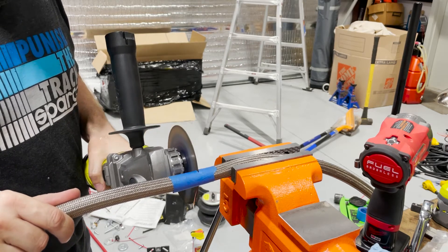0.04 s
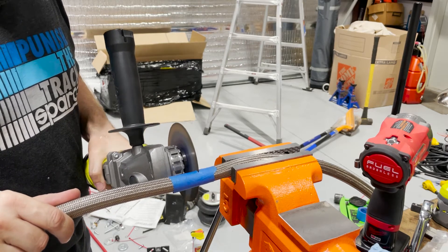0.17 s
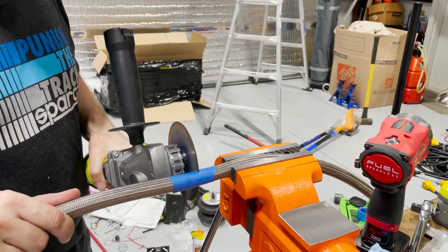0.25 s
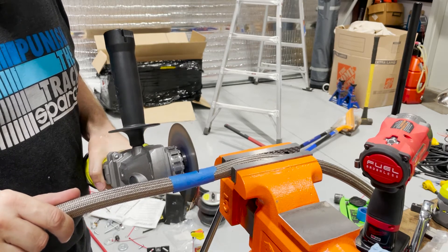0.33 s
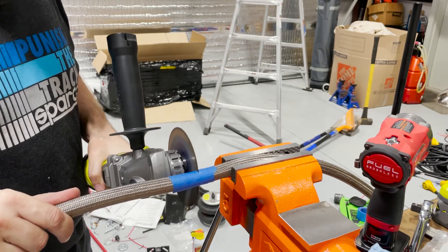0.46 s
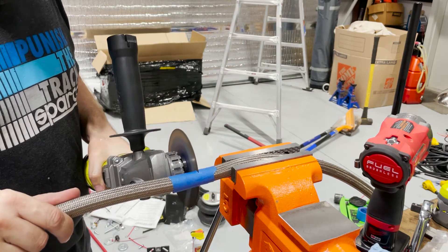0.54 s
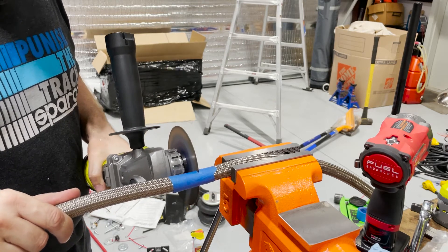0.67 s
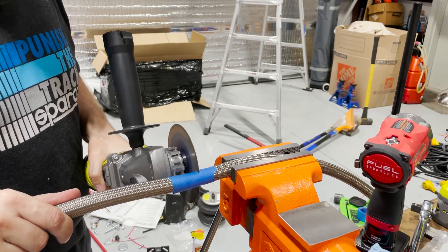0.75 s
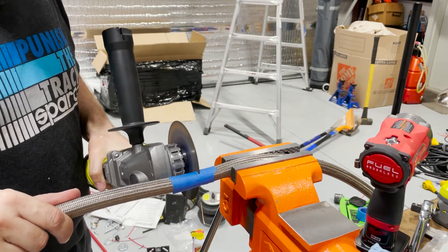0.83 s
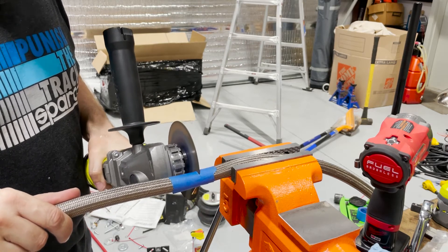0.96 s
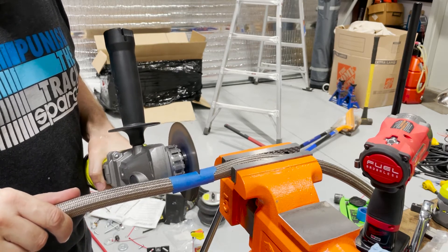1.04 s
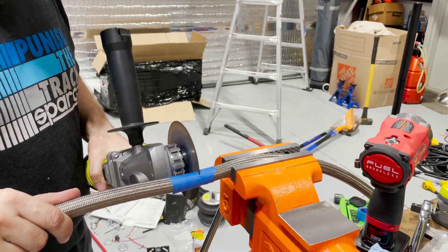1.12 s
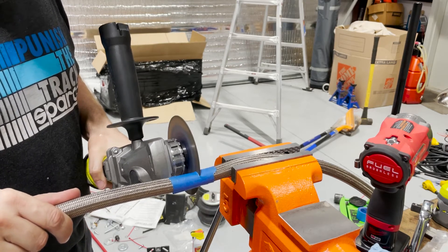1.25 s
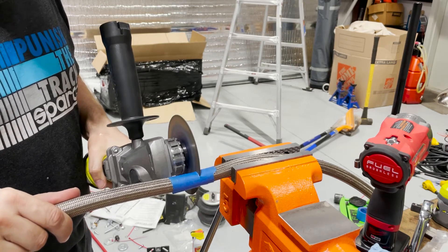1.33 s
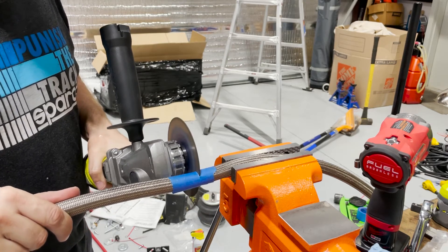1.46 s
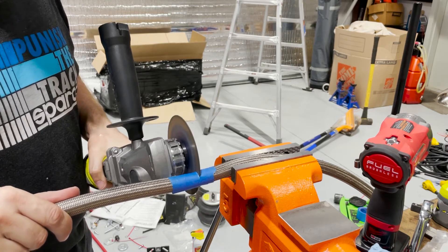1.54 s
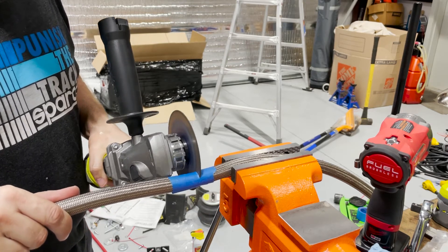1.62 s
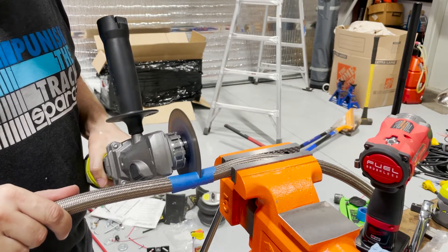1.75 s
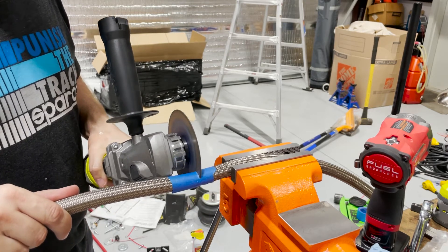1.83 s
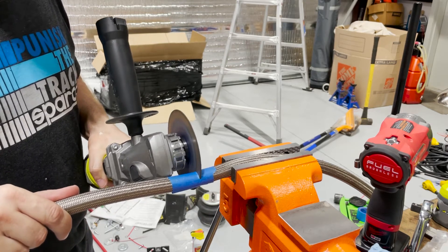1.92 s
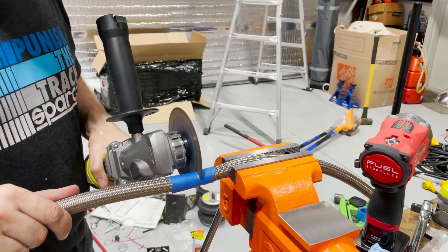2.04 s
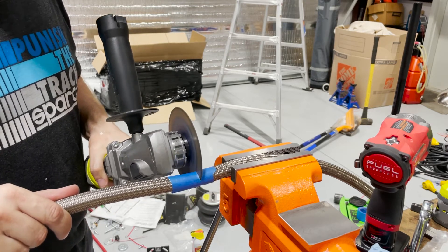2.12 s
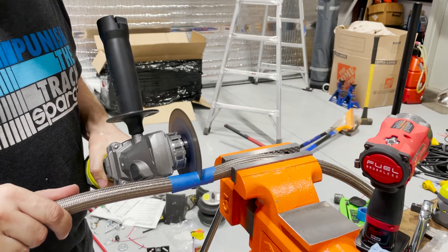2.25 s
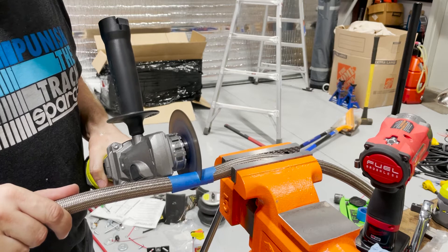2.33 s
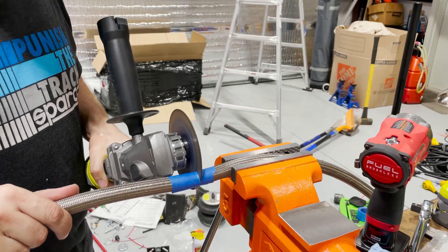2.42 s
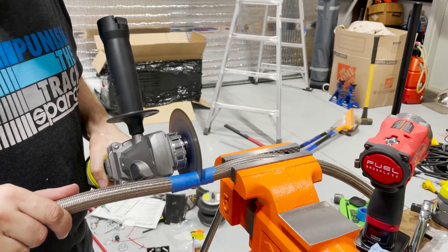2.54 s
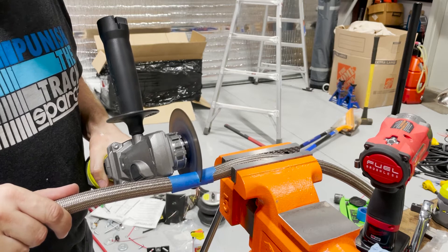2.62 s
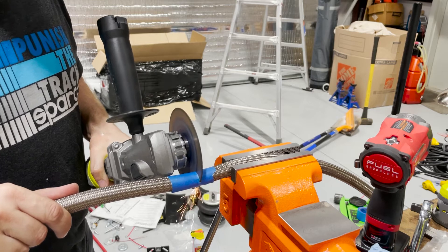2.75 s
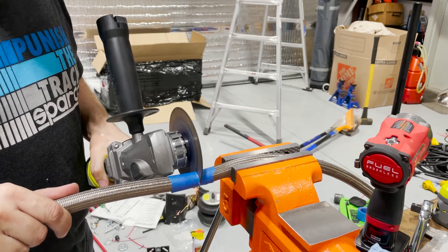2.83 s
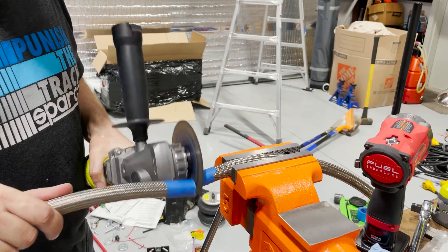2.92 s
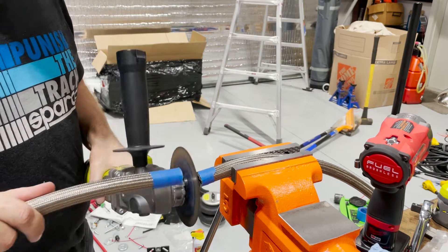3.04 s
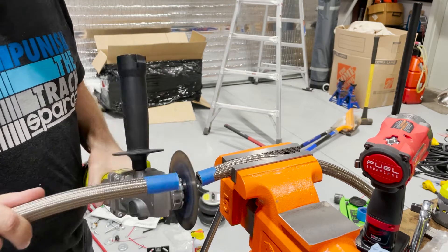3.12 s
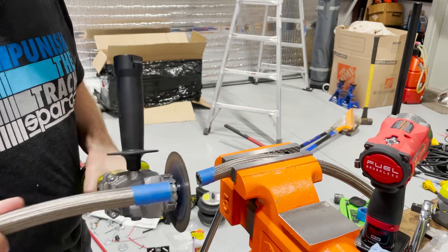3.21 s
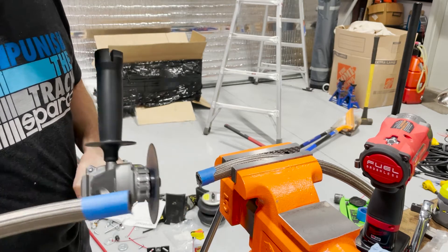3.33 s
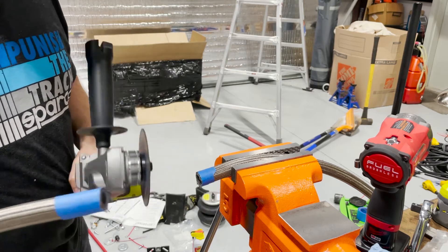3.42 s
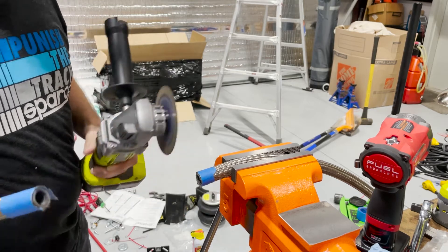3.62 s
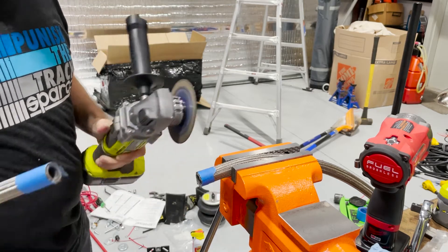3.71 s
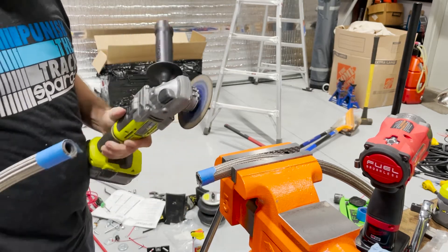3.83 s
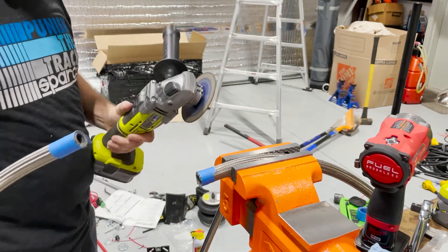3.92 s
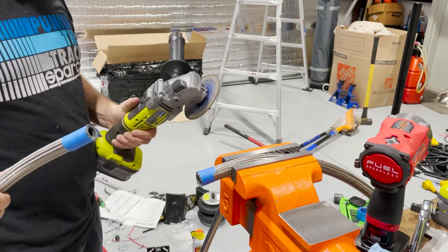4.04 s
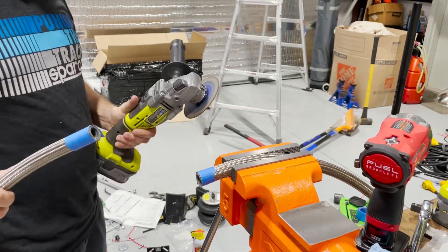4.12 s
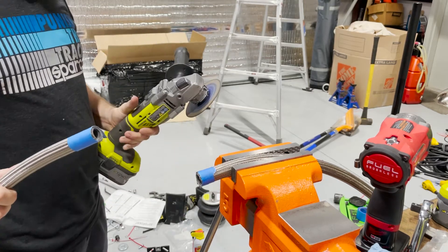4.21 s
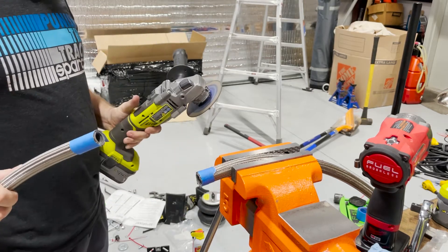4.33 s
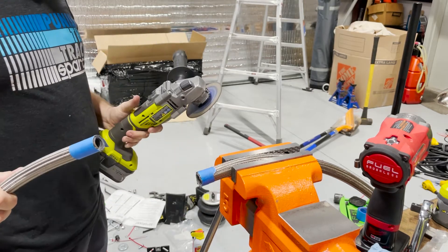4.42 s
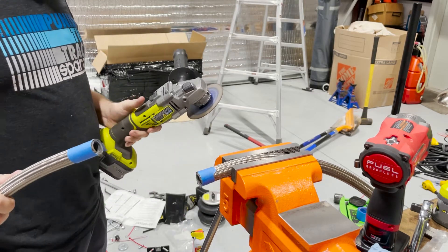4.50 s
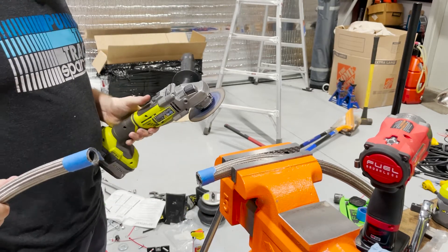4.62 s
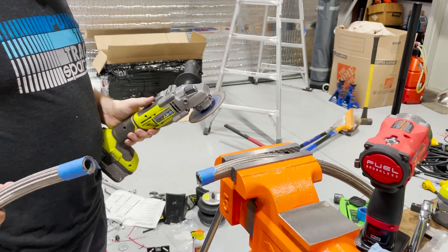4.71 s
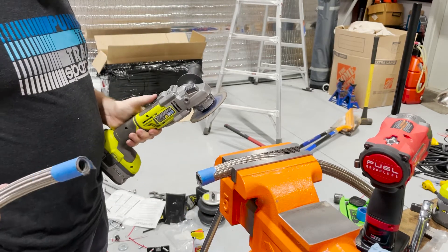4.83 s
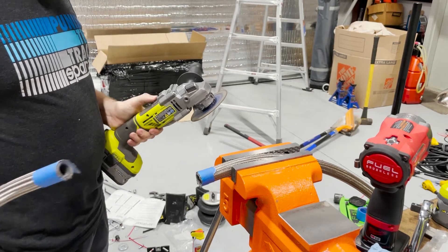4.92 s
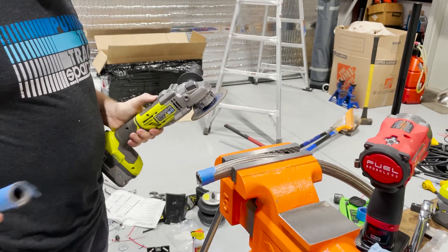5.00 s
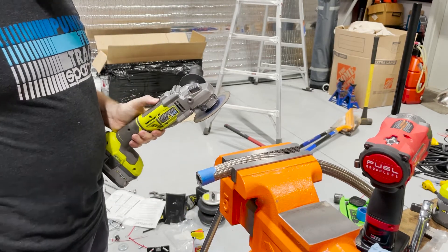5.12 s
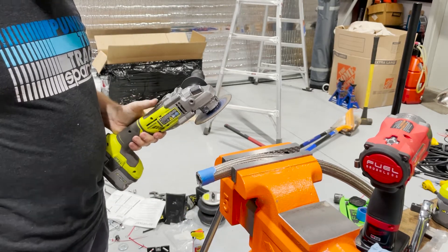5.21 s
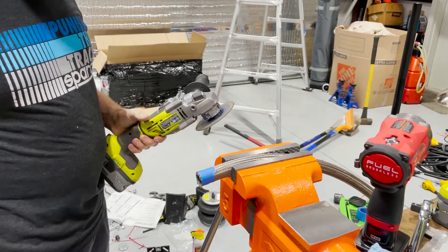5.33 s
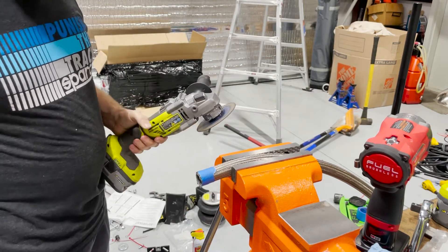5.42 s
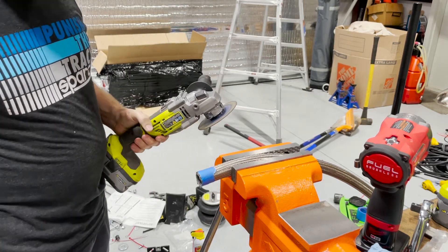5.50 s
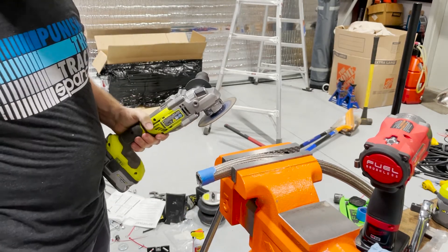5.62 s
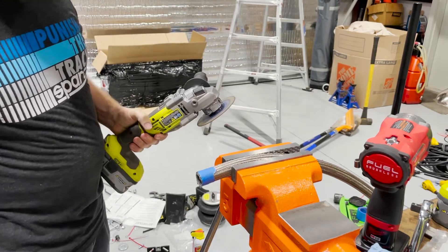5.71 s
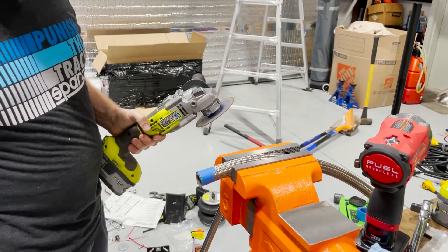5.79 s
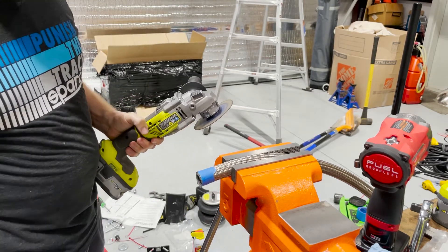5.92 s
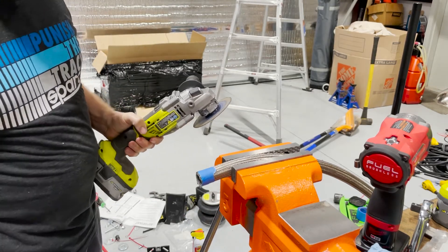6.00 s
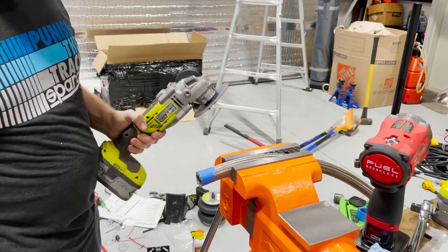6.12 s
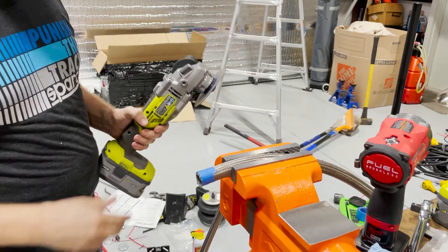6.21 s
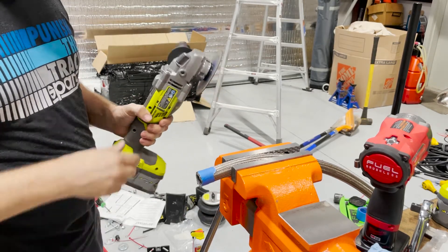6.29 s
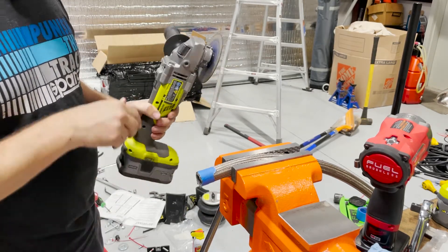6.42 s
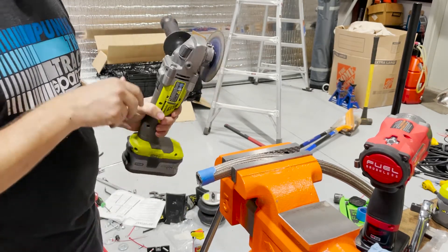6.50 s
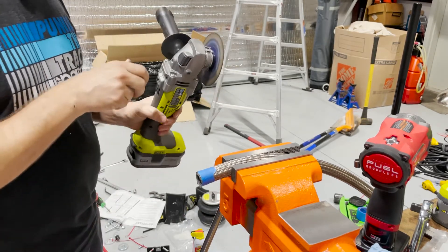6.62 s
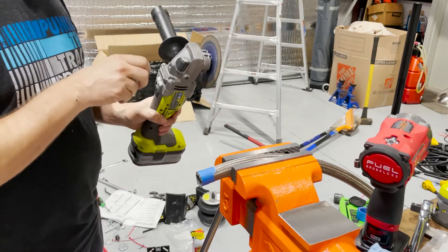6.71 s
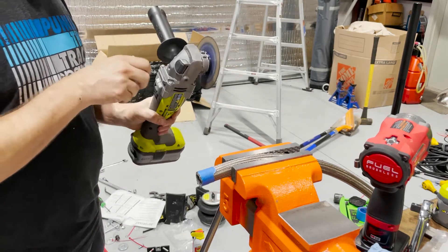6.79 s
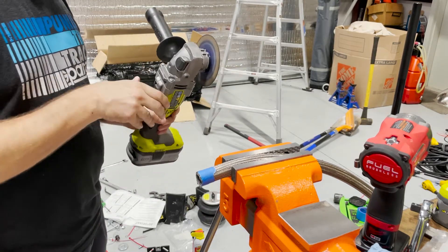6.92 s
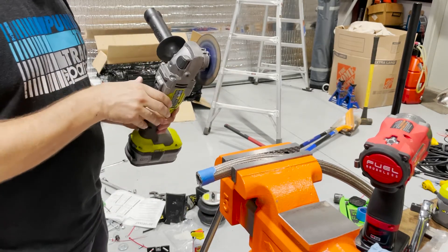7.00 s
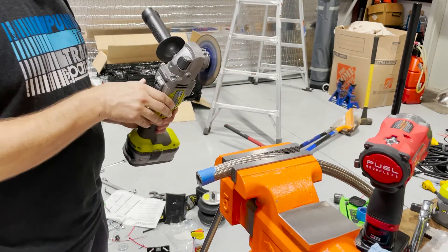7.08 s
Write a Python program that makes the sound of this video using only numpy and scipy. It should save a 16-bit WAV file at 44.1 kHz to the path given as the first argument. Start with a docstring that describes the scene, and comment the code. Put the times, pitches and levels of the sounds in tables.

```python
"""In a garage, a cordless angle grinder scrapes through a braided hose in a vise: patterned noise that wears away.
One motor speed drives scrape, gear and fan whine and magnet hum, all built on multiples of that speed.
The wheel breaks through, the loose end brushes it once more, and the motor speeds up with rushing air noise;
without load the gear teeth rattle in their play, as short bursts of noise that ring the case.
The trigger ticks, then the tool coasts down, still rattling, with the magnets tugging at the case."""
import sys
import numpy as np
from scipy import signal
from scipy.fft import rfft, irfft, next_fast_len
from scipy.io import wavfile
from scipy.ndimage import uniform_filter1d, map_coordinates

SR = 44100
rng = np.random.default_rng(int(sys.argv[2]) if len(sys.argv) > 2 else 0)


def generate_wav(signal):
    """Clip the signal to [-1, 1] and save it as 16-bit WAV at the path in sys.argv[1]."""
    frames = np.transpose(np.atleast_2d(signal))
    scaled = np.clip(frames, -1, 1) * 32767
    pcm = np.round(scaled).astype(np.int16)
    wavfile.write(sys.argv[1], SR, pcm)


def volts_from_decibels(level):
    """Turn decibel levels (scalar or array-like) into linear amplitude factors."""
    exponent = np.asarray(level, float) / 20
    return 10 ** exponent


N = 315298  # length in samples

# Motor speed while cutting. Each row: time in seconds, motor turns a second before the hand's tremble.
CUTTING_SPEED = [(0, 311), (.07, 316), (.17, 317), (.26, 302.5), (.38, 304.4), (.57, 316.5), (.73, 316),
                 (.84, 291), (.94, 289.3), (1.09, 294), (1.19, 290), (1.28, 281), (1.5, 281.5),
                 (1.57, 278.5), (1.68, 270.6), (1.74, 273.3), (1.92, 275.5), (1.99, 271.3), (2.16, 265.8),
                 (2.36, 276), (2.5, 276.5), (2.62, 269), (2.69, 268), (2.875, 261)]
GEAR = 16 / 40  # pinion teeth over wheel gear teeth
IDLE_TURNS, CREEP_TURNS_PER_S = 358.6, .42  # turns a second without load, and its slow rise each second
RECOVER_S, DRAG_SHARE = .11, 1 / 3  # time to pick up speed; share of the sag held by the last strands
COAST_AT_S, COAST_S = 5.206, 2.256  # power off; decay time
FRICTION_TURNS = 111.8  # dry friction, as a speed in turns a second
TREMBLE_TURNS = .55  # unsteadiness of the hand's push, in turns a second
FREE_S = 2.93  # the wheel breaks through

# Loudness of the scrape. Each row: time in seconds, level in dB at full contact.
SCRAPE = [(0, -30.5), (.18, -27.5), (.36, -26.5), (.45, -28.5), (.7, -26.5), (.9, -26), (1.26, -27.5),
          (1.35, -26.5), (1.7, -28), (1.98, -28), (2.16, -32.5), (2.34, -28), (2.43, -29), (2.7, -28),
          (2.9, -27.5)]
# Wheel, hose and vise as one sounding body. Each row: frequency in Hz, relative level in dB.
HOSE_BODY = [(53, -69), (90, -34.5), (223, -39.5), (495, -38.5), (563, -28), (714, -32.5), (1120, -34),
             (1360, -28), (2050, -25), (3230, 10), (4460, -5.5), (5310, -22.5), (7660, -12), (10800, -15.5),
             (15600, -24.5)]
# Resonances of that body. Each row: frequency in Hz, width in Hz, lift in dB.
HOSE_RINGS = [(7460, 240, 5), (10910, 400, 7.5), (1366, 230, 7), (1753, 73, -2), (13700, 180, -5),
              (15100, 1200, 10)]
SPARKS_DB, SPARKS_DB_PER_S = -34, 1.02  # the hiss grows as the wheel sinks in
STRANDS_DB, STRANDS_DB_PER_S = -39, -2  # the sound below 2 kHz fades as strands part
PART_S, PART_DB_PER_S = 2.915, -300  # the hose parts and contact dies away
SNAG_S, SNAG_LENGTH_S, SNAG_DB = 2.985, 0.011, -6  # the loose end brushes the wheel once more

# Loudness of the tones, one list a family: tooth mesh, magnet poles, fan blades, shaft, middle overtones,
# high overtones, mesh octave. Each row: time in seconds, family level in dB before each tone's own offset.
WHINE_LEVELS = [
    [(0, -43), (.35, -52), (.6, -48), (.9, -47), (1.13, -49), (1.28, -32.5), (1.62, -30.5), (2.5, -30),
     (2.88, -36.5), (3.0, -41), (3.15, -68), (3.5, -53), (4.2, -58), (5.1, -49), (5.3, -66), (5.9, -63),
     (6.06, -52), (6.25, -68), (6.6, -75)],
    [(0, -37), (.12, -36.5), (.38, -47), (.65, -36.5), (.78, -40), (.88, -64), (2.9, -57), (3.0, -42),
     (3.25, -33.5), (3.5, -32.5), (3.72, -42), (4.0, -36.5), (5.05, -37), (5.25, -49.5), (5.65, -76),
     (6.3, -76), (6.6, -66), (6.9, -79), (7.15, -90)],
    [(0, -65), (.2, -39), (.78, -46.5), (1.0, -66), (1.12, -37), (1.27, -60), (2.4, -51), (2.75, -35.5),
     (3.0, -46.5), (3.38, -54), (3.75, -49.5), (3.95, -40), (4.4, -43), (4.75, -48.5), (5.65, -45.5),
     (6.1, -60.5), (7.15, -83)],
    [(0, -59), (.19, -56.5), (.25, -78), (.42, -80), (.48, -56), (.74, -56), (.8, -61.5), (2.8, -61),
     (3.0, -76), (3.5, -71), (4.0, -75.5), (4.2, -66), (5.25, -67.5), (5.4, -86)],
    [(0, -57), (.78, -46), (.88, -70), (2.9, -72.5), (3.1, -55), (3.6, -60), (4.2, -49), (5.15, -52),
     (5.45, -57), (5.65, -47), (5.85, -51.5), (6.05, -70), (7.15, -71)],
    [(2.9, -77), (3.1, -57), (3.55, -51), (3.9, -59), (4.35, -62), (4.85, -59), (5.4, -64), (5.65, -57),
     (5.85, -67), (6.1, -78)],
    [(1.2, -56), (1.9, -45), (2.05, -45), (2.3, -40), (2.45, -51), (2.65, -36.5), (2.88, -41), (3.0, -88),
     (4.9, -76), (5.3, -83)],
]
# Which multiples of the motor speed sing, one list a family in the same order.
WHINE_MULTIPLES = [
    [16, 17],
    [8, 9, 10, 5.6, 40],
    [13, 28],
    [1, 2, 3, 5],
    [12, 14, 24],
    [20, 26, 39],
    [32],
]
# Offset of each of those multiples, one list a family. Each row: dB under load, dB running free.
WHINE_OFFSETS = [
    [(0, -1), (-16.5, -11)],
    [(-2, -2.5), (-6.5, -25), (5.5, -26), (-9, -45), (-21, -48)],
    [(5, 0), (-16, -34)],
    [(-25, 0), (-2.5, -11.5), (-10, -8), (5.5, -18)],
    [(0, -1), (-15, -9), (-1, -17)],
    [(2, -1.5), (0, -2.5), (-6, -23)],
    [(2, 9)],
]
# Two low tones. Each row: time in seconds, hum at wheel speed in dB, growl at four times motor speed in dB.
HUM_LEVELS = [(0, -90, -81), (.75, -93, -45.5), (.9, -95, -67), (2.9, -100, -61), (2.96, -90, -46.5),
              (3.08, -77, -50), (3.3, -76, -52), (3.8, -76, -83), (4.1, -82, -60), (5.2, -84, -61.5),
              (5.45, -91, -53.5), (5.55, -95, -96)]

# Steady hum of the room. Each row: frequency in Hz, relative level in dB.
ROOM_FLOOR = [(20, -28), (60, -1.5), (130, -2.5), (300, -6.5), (900, 2), (3000, -9), (15000, -34)]
ROOM_FLOOR_DB = -66.5  # its overall level

# Noise of the free tool. Each row: time in seconds, air in dB, light taps in dB (both relative).
FREE_NOISE = [(2.9, -42.5, -29), (3.05, -48.5, -39.5), (3.3, -50, -55), (3.55, -50.5, -39.5),
              (3.8, -51, -43), (4, -52, -56), (4.8, -54, -48), (5.3, -53.5, -41), (5.5, -59, -42.5),
              (5.9, -68.5, -55), (6.2, -73, -46), (6.7, -70.5, -53), (7.15, -82, -58)]
# Tone colour of the fan air. Each row: frequency in Hz, relative level in dB.
AIR_COLOUR = [(53, -67), (90, -35), (301, -35), (358, -30), (986, -24.5), (1390, -6), (1770, -19),
              (2660, -6.5), (2840, -12.5), (3030, -9.5), (4760, -14.5), (5080, -32), (5910, -14.5),
              (6580, -15.5), (15600, -39)]
# Tooth knocks at set times, strong and weak. Each row: time in seconds, relative strength in dB.
SET_KNOCKS = [(3.035, -37), (3.16, -35), (3.2523, -31), (3.3481, -29), (3.432, -29.5), (3.751, -28),
              (3.877, -30), (3.9554, -31), (4.1145, -32), (4.1564, -32), (4.24, -31), (4.332, -36),
              (4.415, -30), (4.4903, -27), (4.5264, -28), (4.6663, -29), (4.7967, -29.5), (4.9023, -30),
              (4.9772, -31), (5.238, -32), (5.3932, -28), (5.4917, -32), (5.5494, -23), (5.583, -25.5),
              (5.6294, -29), (5.6565, -30), (5.691, -25), (5.7195, -25), (5.7677, -25.5), (5.8006, -29),
              (5.865, -30), (5.8855, -28), (5.9331, -31), (5.976, -28), (6.0686, -27), (6.093, -29.5),
              (6.134, -29), (6.2077, -25.5), (6.301, -26), (6.3491, -26), (6.3882, -26), (6.4186, -30.5),
              (6.4829, -31), (6.5682, -28.5), (6.6965, -33), (6.7433, -29.5), (6.8268, -33),
              (6.8765, -30.5), (6.965, -31.5), (7.0128, -28.5), (7.0855, -29.5), (7.116, -26),
              (7.143, -28.5)]
# Knocks that fill the time between those. Each row: time in seconds, knocks a second,
# usual relative strength in dB, typical scatter of the strength in dB.
FILLING_KNOCKS = [(3.15, 69, -35, 3), (3.42, 71, -34, 3.5), (3.5, 54, -33.5, 6.5), (3.85, 52, -33, 5),
                  (3.95, 57, -33, 1.5), (4.3, 69.6, -32.5, 1), (5.2, 58, -32.5, 1), (5.6, 60, -31.5, 4),
                  (6.2, 85, -31, 4), (6.6, 103, -34.5, 5), (7.15, 92, -38, 5)]
UNEVEN = .12  # timing scatter of the filling knocks, as a share of the gap between knocks
# Resonances of the gear case, one list a part. Each row: frequency in Hz, width in Hz, relative level in dB.
GEAR_CASE = [
    [(447, 170, 0)],
    [(559.8, 21.3, 7.5)],
    [(1160, 110, -22), (2522, 226, -1.5), (3105, 233, 2), (3284, 340, 4), (3690, 170, -3.5),
     (4400, 280, -25), (4920, 190, -22)],
    [(5760, 424, -1), (6650, 540, -13)],
    [(7784, 343, 0.5)],
    [(8920, 510, 0.5), (9430, 183, -3), (14900, 400, -30)],
]
# How loud each part rings as the tool is turned and the teeth change flank. Each row: time in seconds,
# then relative dB of the rumble, 550 Hz, 3 kHz, 6 kHz, 8 kHz and 9 kHz parts.
CASE_FACING = [(2.95, -32, -28, 9, -14, 4, -3.5), (3.4, -43.5, -27, 8.5, 3.5, 2, -9),
               (3.7, -34, -14, 3.5, -8, -1.5, -11), (4., -36, -11.5, -15, 2, -11, -12),
               (5.15, -38, -16.5, -22, 2.5, 0, -11), (5.25, -9.5, -4, 1, -2, 2, 0),
               (5.55, -17, -7.5, -9, -12, -8, 3.5), (5.9, -22.5, -16, -2, -19, 4, 2),
               (6.3, -21.5, -9.5, 2, -19.5, -3.5, -5), (6.6, -25.5, -10.5, -0.5, -23, 1, -5),
               (6.9, -22.5, -13.5, -2.5, -26, -5.5, -2.5), (7.15, -25, -16, -6, -22, -2.5, -5.5)]
# Gain of the knocks into the case, where light taps have 0 dB. One number in dB for each part.
KNOCK_GAIN = [1.9, -2.6, -5.5, 1, -0.3, 0.34]
CRACK_DB = -35  # the bare top of each knock, above the case's ringing, before its fall in the coast
# Magnet tugs while coasting, at 8, 12, .. 32 times the motor speed.
# Each row: dB into the case, dB straight through the vents.
MAGNET_TUGS = [(-52, -80), (-55, -76), (-51, -86), (-58, -74), (-62, -84), (-47.5, -90), (-53.5, -92)]

# Trigger tick. Each row: time in seconds, starting noise level in dB before its band filter.
TRIGGER_TICKS = [(5.0978, -35)]


def evened(x):
    """Scales a sound to an average (rms) level of 1."""
    return x / np.sqrt(np.mean(x ** 2) + 1e-20)


def curve(rows, column):
    """Joins one column of a table by straight lines, giving a value at every sample."""
    return np.interp(np.arange(N) / SR, [r[0] for r in rows], [r[column] for r in rows])


def colour(x, points, lifts=()):
    """Filters a sound by a spectrum in dB, with extra resonant lifts."""
    size = next_fast_len(N)
    hz = np.fft.rfftfreq(size, 1 / SR)
    f, db = np.transpose(points)
    shape_db = np.interp(np.log(hz + 1), np.log(f + 1), db)
    for centre, width, lift_db in lifts:
        shape_db = shape_db + lift_db / (1 + (2 * (hz - centre) / width) ** 2)
    return irfft(rfft(x, size) * volts_from_decibels(shape_db), size)[:N]


def band(x, lo_hz, hi_hz):
    """Keeps mainly the frequencies between two limits."""
    limits = [lo_hz, min(hi_hz, .49 * SR)]
    return signal.sosfilt(signal.butter(3, limits, "band", fs=SR, output="sos"), x)


def ring(x, hz, width):
    """Lets one resonance ring, with a gain of 1 at its centre."""
    return signal.lfilter(*signal.iirpeak(hz, hz / width, SR), x)


def slow(rate_hz):
    """Slow random drift: noise smoothed by a low-pass filter, at rms 1."""
    return evened(signal.lfilter(*signal.butter(1, rate_hz, fs=SR), rng.standard_normal(N)))


def after(s, blend_s):
    """Rises from 0 to 1 in a straight line of length blend_s, centred on time s."""
    return np.clip((np.arange(N) / SR - s) / blend_s + .5, 0, 1)


def speed():
    """Motor turns a second: held down by the cut, recovering to idle, then slowed by drag and friction."""
    t = np.arange(N) / SR
    end_s, end_turns = CUTTING_SPEED[-1]
    tremble = TREMBLE_TURNS * evened(uniform_filter1d(slow(8), 900))
    loaded = curve(CUTTING_SPEED, 1) + tremble
    u = np.maximum(t - end_s, 0) / RECOVER_S
    idle = IDLE_TURNS + CREEP_TURNS_PER_S * (np.minimum(t, COAST_AT_S) - end_s)
    sag = DRAG_SHARE * np.exp(-u ** 2) + (1 - DRAG_SHARE) * np.exp(-u)
    free = idle - (IDLE_TURNS - end_turns) * sag
    # drag slows the motor in proportion to its speed, dry friction by a steady amount
    decay = np.exp(-np.maximum(t - COAST_AT_S, 0) / COAST_S)
    coast = (free + FRICTION_TURNS) * decay - FRICTION_TURNS
    return np.where(t < end_s, loaded, coast)


def rim(wheel, size, memory, smooth):
    """A random profile round the wheel that comes back every turn and wears away over some turns."""
    field = rng.standard_normal((int(wheel[-1]) + 3, size))  # one row a turn
    for _ in range(2):
        field = uniform_filter1d(field, max(round(memory), 1), 0)
    field = evened(uniform_filter1d(field, max(round(smooth), 1), 1, mode="wrap"))
    field = np.hstack([field, field[:, :1]])
    return map_coordinates(field, [wheel, wheel % 1 * size], order=1)


def cut(turns, lumps_db=1.5):
    """The grit meets the strands in the same order each turn; breaking wire adds fresh noise, most in the treble."""
    t = np.arange(N) / SR
    wheel = np.minimum(turns * GEAR, 400)  # the profile is not needed after the cut
    grit = evened(rim(wheel, size=768, memory=22, smooth=1))
    contact = volts_from_decibels(lumps_db * rim(wheel, size=64, memory=16.0, smooth=8))  # high spots bite harder
    noise = rng.standard_normal(N)

    def mixed(fresh):
        """Blends the repeating grit with fresh noise and passes both through the body of the hose."""
        return colour(contact * ((1 - fresh) * grit + fresh * noise), HOSE_BODY, HOSE_RINGS)

    low, high = mixed(.12), mixed(.4)
    strands = evened(band(low, 987, 1990))
    scrape = evened(band(low, 1890, 5270))
    sparks = evened(band(high, 4840, 15000))
    sparks = sparks + (volts_from_decibels(3.0 * slow(8.2)) - 1) * band(sparks, 11500, 15200)  # the very top comes and goes
    snag = volts_from_decibels(SNAG_DB) * np.exp(-((t - SNAG_S) / SNAG_LENGTH_S) ** 2)
    touch = volts_from_decibels(PART_DB_PER_S * np.maximum(t - PART_S, 0)) + snag
    # the wheel runs out of true and thumps the vise once a turn
    thump = np.zeros(N)
    for k in range(2, 11):
        thump += volts_from_decibels(2 * slow(4)) * np.cos(2 * np.pi * (k * wheel + rng.random()))
    thrum = volts_from_decibels(-62.0) * evened(colour(thump, HOSE_BODY))
    thrum += volts_from_decibels(-62.5) * evened(band(colour(noise, HOSE_BODY), 79, 820))
    bright = volts_from_decibels(curve(SCRAPE, 1)) * scrape
    bright += volts_from_decibels(STRANDS_DB + STRANDS_DB_PER_S * t) * strands
    sparks_db = SPARKS_DB + SPARKS_DB_PER_S * t + 1.33 * slow(1.5)
    bright += volts_from_decibels(sparks_db) * touch ** 0.66 * sparks
    return touch * bright + thrum * (1 - after(FREE_S, 0.036))


def whine(turns, waver_db=1.0):
    """Gear, magnets, fan and shaft sing as sines at multiples of the motor speed, each wavering a little."""
    free, out = after(FREE_S, 0.025), np.zeros(N)
    for number, family in enumerate(WHINE_OFFSETS):
        for multiple, (load_db, free_db) in zip(WHINE_MULTIPLES[number], family):
            offset_db = load_db + free * (free_db - load_db)
            level_db = curve(WHINE_LEVELS[number], 1) + offset_db + waver_db * slow(4.4)
            if number == 0:  # the teeth lose contact for a moment as the load drops away
                level_db -= 14 * free * (1 - after(FREE_S + 0.23, .2))
            tone = np.sin(2 * np.pi * (multiple * turns + rng.random()))
            out += np.sqrt(2) * volts_from_decibels(level_db) * tone
    return out


def garage(x, t60_s=0.48):
    """The room's reflections: a short tail of fading noise, starting 4 ms after the sound."""
    t = np.arange(round(.4 * SR)) / SR
    tail = rng.standard_normal(len(t)) * volts_from_decibels(-60 * t / t60_s) * (t > .004)
    return signal.oaconvolve(x, tail / np.linalg.norm(tail))[:N]


def room_hum():
    """The steady, quiet background of the room, made of coloured noise."""
    return volts_from_decibels(ROOM_FLOOR_DB) * evened(colour(rng.standard_normal(N), ROOM_FLOOR))


def wobble(turns):
    """A hum at wheel speed, and a growl at four times motor speed that swells
    briefly during the cut, at release and early in the coast."""
    wheel = np.sin(2 * np.pi * turns * GEAR)
    growl = np.sin(8 * np.pi * turns)
    return np.sqrt(2) * (volts_from_decibels(curve(HUM_LEVELS, 1)) * wheel + volts_from_decibels(curve(HUM_LEVELS, 2)) * growl)


def air(turns):
    """Fan and bearing noise, throbbing once each turn of the shaft."""
    throb = 1 + 0.35 * np.sin(2 * np.pi * turns)
    noise = colour(throb * volts_from_decibels(1.6 * slow(17)) * rng.standard_normal(N), AIR_COLOUR)
    noise /= np.std(band(noise, 1000, 2000))  # levels are set by this band
    return volts_from_decibels(curve(FREE_NOISE, 1)) * after(FREE_S, 0.065) * noise


def knocks(count=400):
    """Times and strengths of tooth knocks: those at set times, with a whole number of steps filling each gap."""
    s, set_db = np.transpose(SET_KNOCKS)
    at_s, rate, usual_db, scatter_db = np.transpose(FILLING_KNOCKS)
    gap = np.diff(s)
    steps = np.maximum(np.round(gap * np.interp(s[1:] - gap / 2, at_s, rate)), 1)
    fixed = np.append(0, np.cumsum(steps)).astype(int)  # which knocks have set times
    every = np.arange(fixed[-1] + 1)
    shift = rng.standard_normal(count)[every]
    weak = rng.exponential(1, count)[every]  # a large value is a glancing knock
    shift[fixed] = 0
    times = np.interp(every + UNEVEN * shift, fixed, s)
    strength_db = np.interp(times, at_s, usual_db) + np.interp(times, at_s, scatter_db) * (1 - weak)
    strength_db[fixed] = set_db
    return times, strength_db


def knock_bursts(size=96):
    """Teeth knock across their play: each knock is a two-millisecond scrape holding all frequencies alike."""
    s, strength_db = knocks()
    phases = rng.random((400, size // 2 + 1))[:len(s)]
    scrapes = irfft(np.exp(2j * np.pi * phases), size)
    onset = np.arange(size) / SR / 0.00044
    scrapes = scrapes * onset * np.exp(1 - onset)
    drive = np.zeros(N + size)
    at = (s * SR).astype(int)[:, None] + np.arange(size) - size // 4
    np.add.at(drive, at, volts_from_decibels(30.0 + strength_db)[:, None] * scrapes)
    return drive[:N]


def light_taps(turns, spread_db=4):
    """The pinion taps lightly about twice a turn, each tap a short swell of noise of random strength."""
    taps = np.diff(np.floor(2 * turns + .1 * slow(60)), prepend=0) > 0
    taps = taps * volts_from_decibels(spread_db * np.minimum(rng.exponential(1, N), 3))
    t = np.arange(200) / SR / 0.00071
    swell = evened(signal.oaconvolve(taps, t * np.exp(1 - t))[:N])
    noise = (0.028 + swell) * rng.standard_normal(N)
    return volts_from_decibels(curve(FREE_NOISE, 2) + 2.5) * after(FREE_S, 0.055) * noise


def magnet_tugs(turns):
    """Magnets tug four times a turn: overtones of that rate, into the case and straight through the vents."""
    case_db, vent_db = np.transpose(MAGNET_TUGS)
    multiple = 4 * (np.arange(len(MAGNET_TUGS)) + 2)
    tugs = np.cos(2 * np.pi * (multiple[:, None] * turns + rng.random((len(MAGNET_TUGS), 1))))
    into_case = after(5.38, 0.48) * (volts_from_decibels(case_db) @ tugs)
    through_vents = after(5.03, .4) * (volts_from_decibels(vent_db) @ tugs)
    return into_case, through_vents


def rattle(turns):
    """Knocks, light taps and magnet tugs ring the resonances of the gear case."""
    drive, light = knock_bursts(), light_taps(turns)
    into_case, through_vents = magnet_tugs(turns)
    crack = volts_from_decibels(CRACK_DB - 9 * after(5.34, .8)) * band(drive, 10300, 15000)
    out = through_vents + crack
    for number, part in enumerate(GEAR_CASE):
        push = volts_from_decibels(KNOCK_GAIN[number]) * drive + light
        if number == 2:  # tugs shake the 3 kHz part
            push = push + into_case
        modes = np.zeros(N)
        for hz, width, db in part:
            near = band(push, hz - 1.18 * width, hz + 1.3 * width)
            modes += volts_from_decibels(db) * ring(near, hz, width)
        out += volts_from_decibels(curve(CASE_FACING, number + 1)) * modes
    return out


def switch():
    """A dry, bright tick from the trigger: a burst of noise that dies away in a few milliseconds."""
    out, t = np.zeros(N), np.arange(600) / SR
    for s, start_db in TRIGGER_TICKS:
        at = round(s * SR)
        out[at:at + len(t)] += volts_from_decibels(start_db) * np.exp(-t / 0.0032) * rng.standard_normal(len(t))
    return band(out, 6000, 15300)


def scene():
    """Grinder, its reflections and the room's hum, alike in both channels."""
    turns = np.cumsum(speed()) / SR  # motor turns made so far
    cutting = cut(turns)
    tool = air(turns) + rattle(turns)
    reflections = garage(volts_from_decibels(-14.5) * cutting + volts_from_decibels(-11) * tool)
    mix = cutting + tool + reflections + whine(turns) + wobble(turns) + switch() + room_hum()
    return np.tile(mix, (2, 1))


def roll_off(x):
    """The treble ends steeply here."""
    return signal.sosfilt(signal.butter(12, 15830, fs=SR, output="sos"), x)


def record(dry):
    """Takes the finished mix to its final form."""
    return roll_off(dry)


dry = scene()
out = record(dry)
generate_wav(out)
```